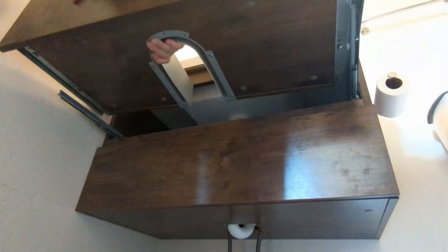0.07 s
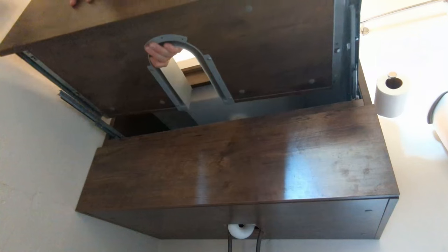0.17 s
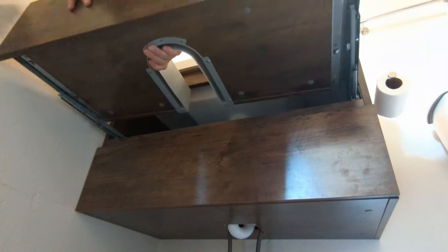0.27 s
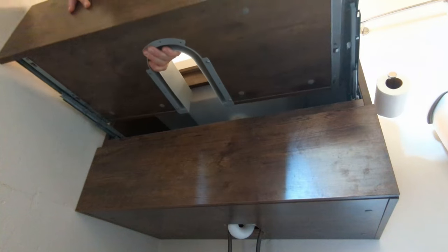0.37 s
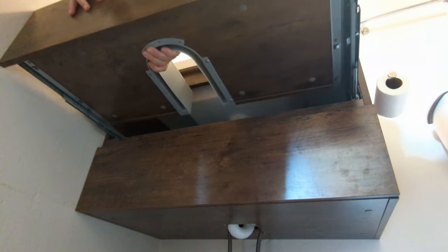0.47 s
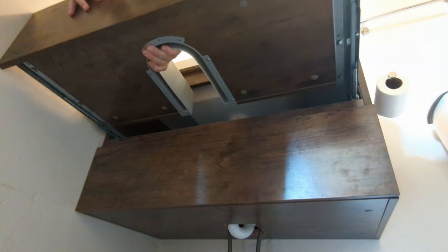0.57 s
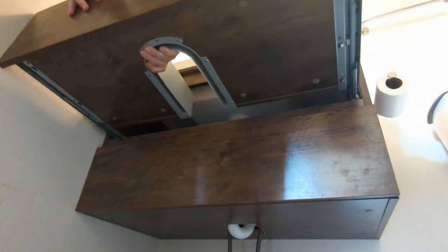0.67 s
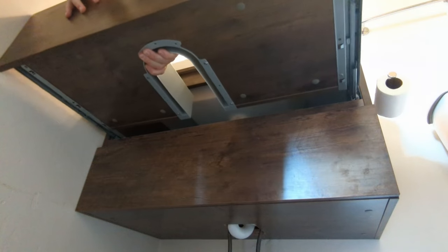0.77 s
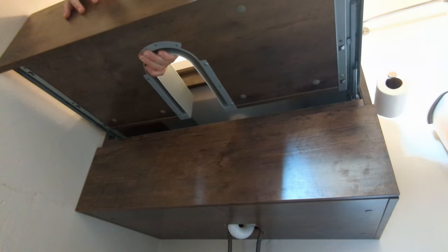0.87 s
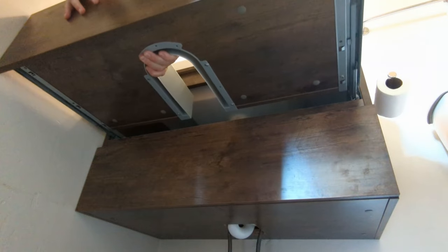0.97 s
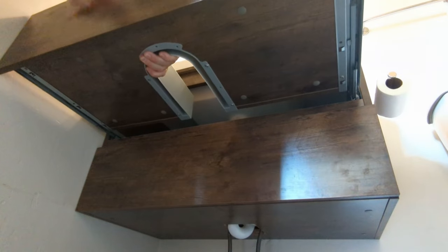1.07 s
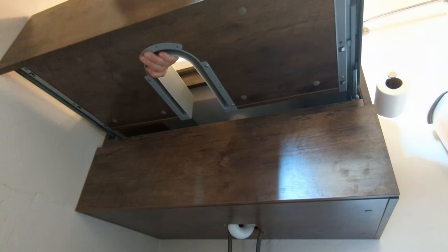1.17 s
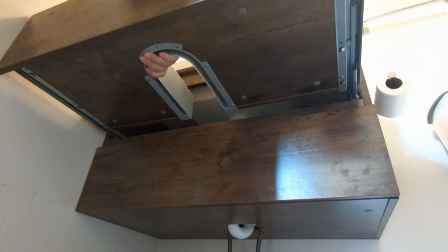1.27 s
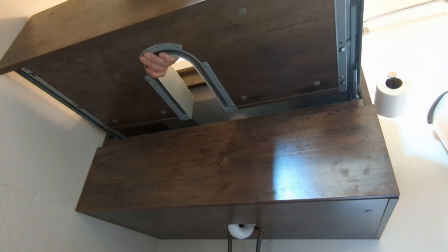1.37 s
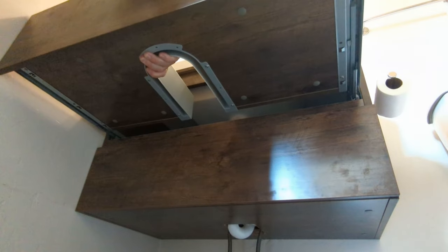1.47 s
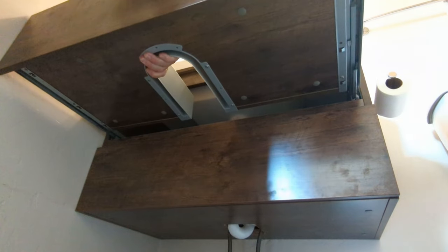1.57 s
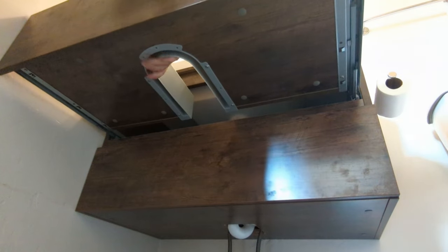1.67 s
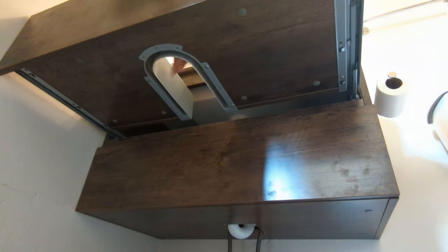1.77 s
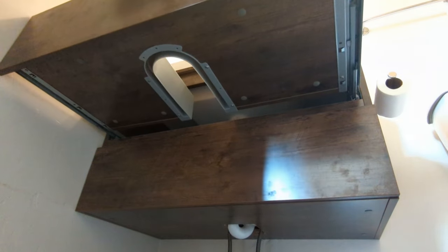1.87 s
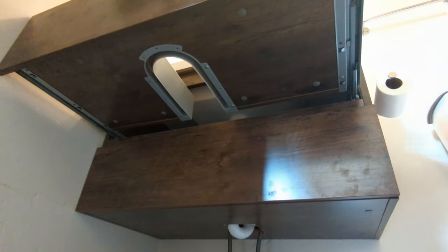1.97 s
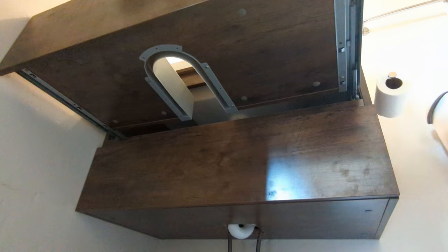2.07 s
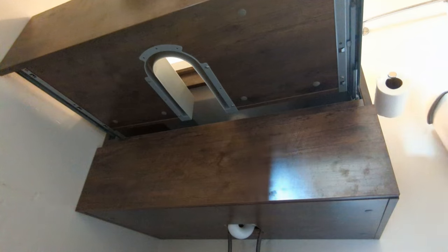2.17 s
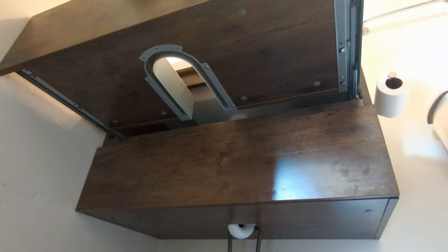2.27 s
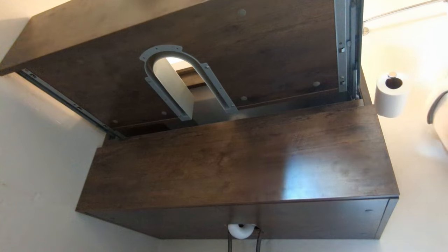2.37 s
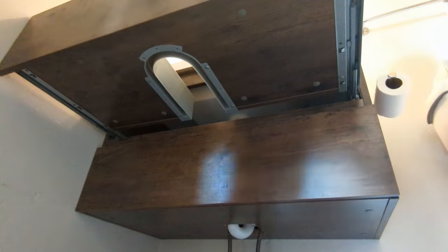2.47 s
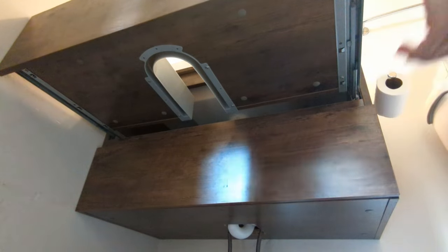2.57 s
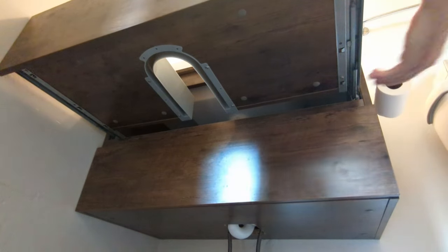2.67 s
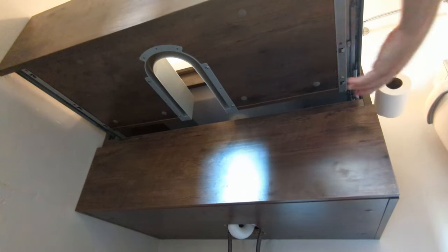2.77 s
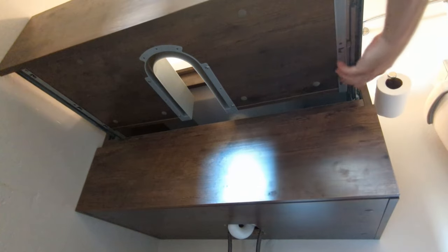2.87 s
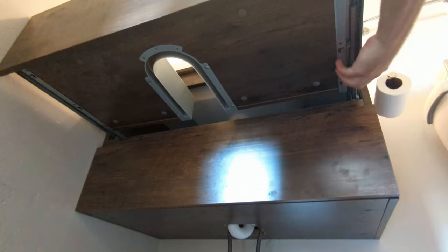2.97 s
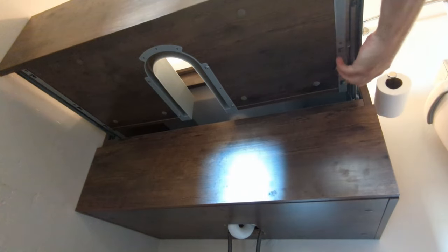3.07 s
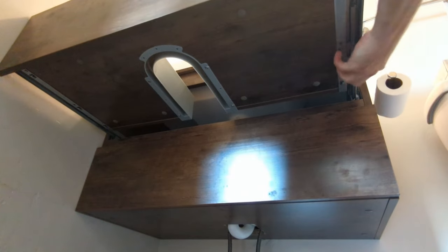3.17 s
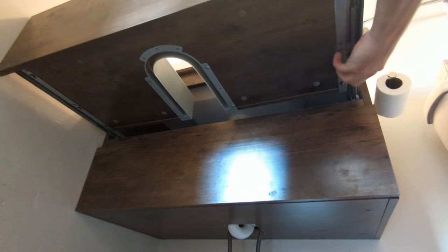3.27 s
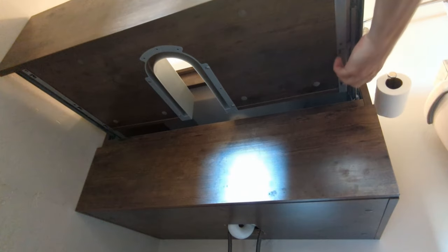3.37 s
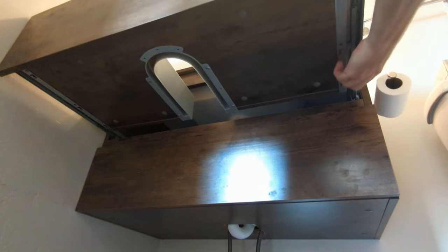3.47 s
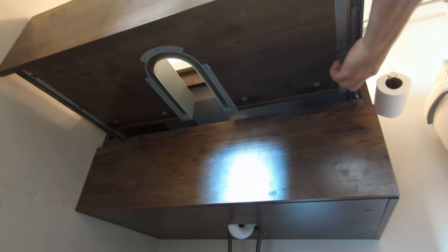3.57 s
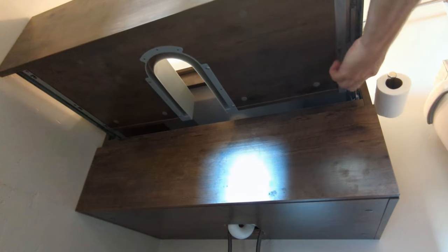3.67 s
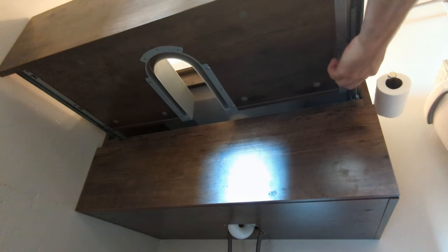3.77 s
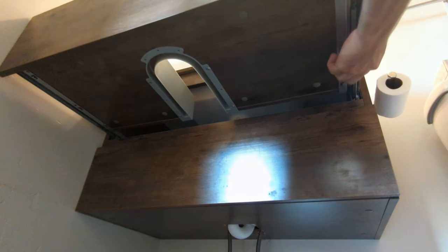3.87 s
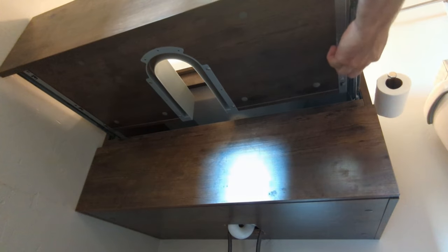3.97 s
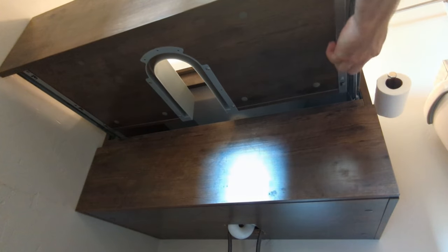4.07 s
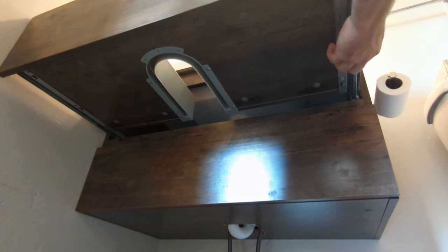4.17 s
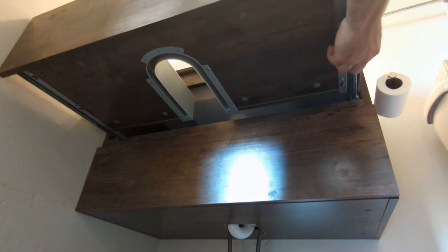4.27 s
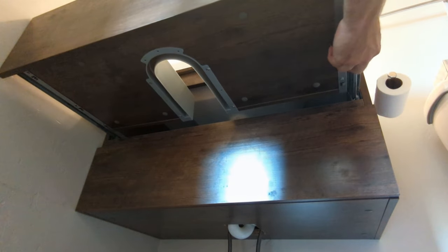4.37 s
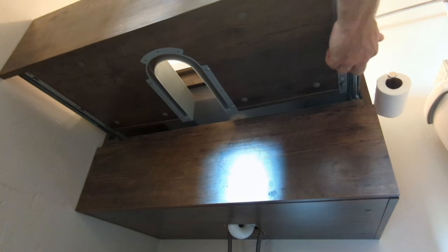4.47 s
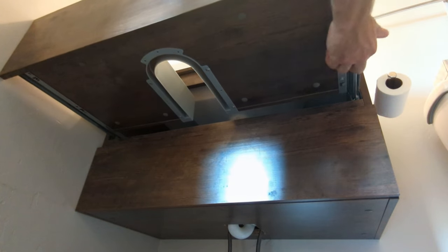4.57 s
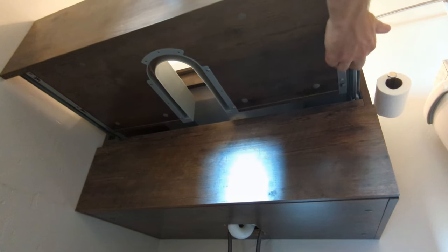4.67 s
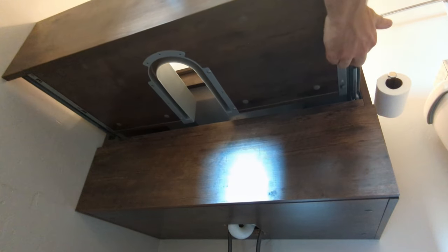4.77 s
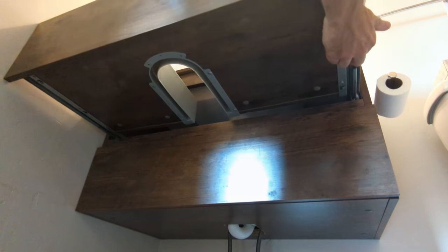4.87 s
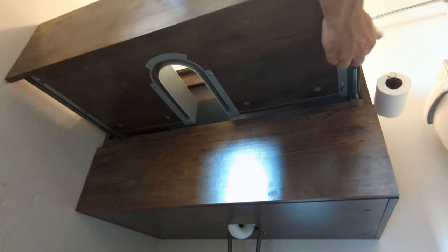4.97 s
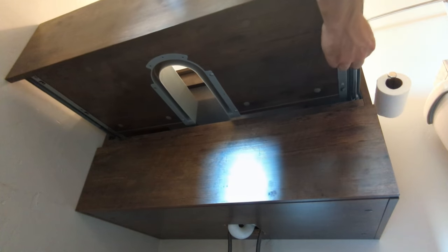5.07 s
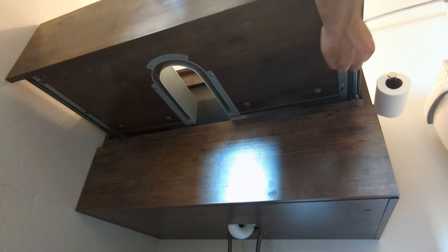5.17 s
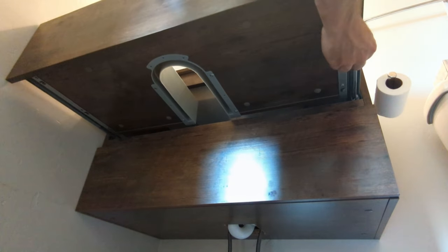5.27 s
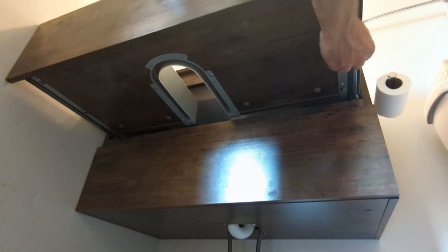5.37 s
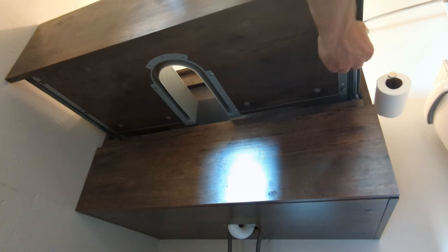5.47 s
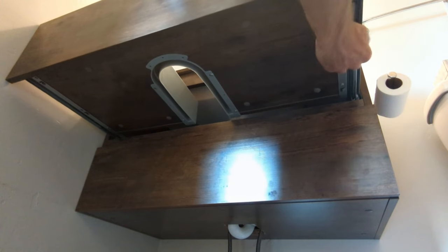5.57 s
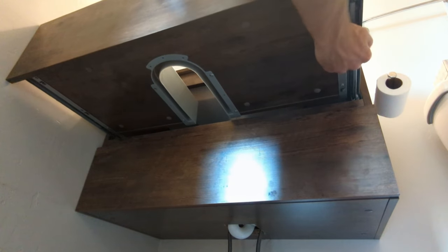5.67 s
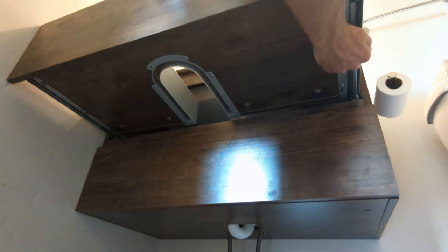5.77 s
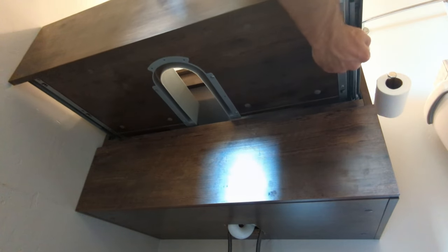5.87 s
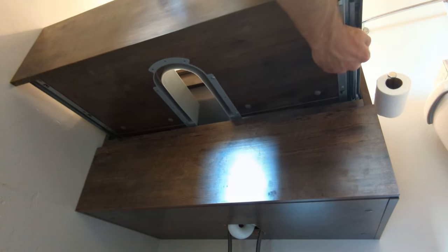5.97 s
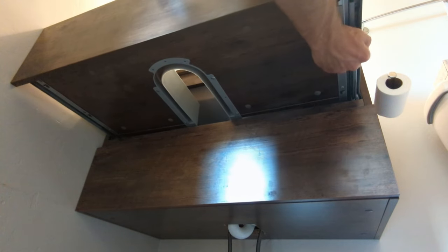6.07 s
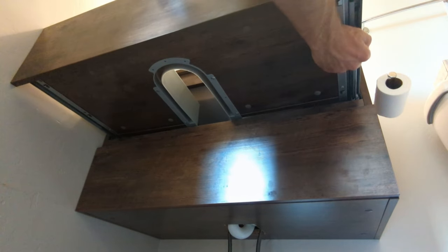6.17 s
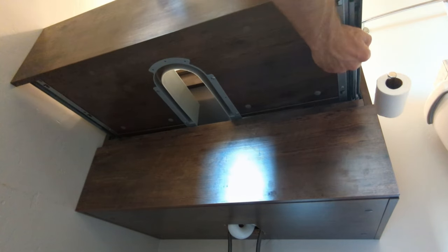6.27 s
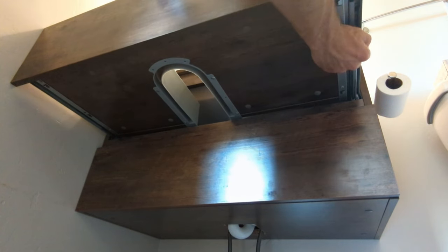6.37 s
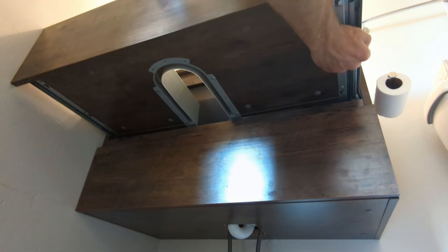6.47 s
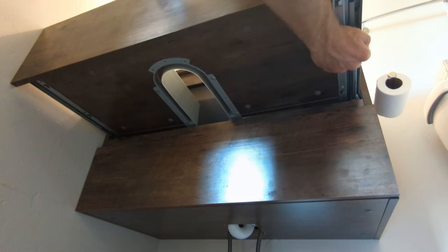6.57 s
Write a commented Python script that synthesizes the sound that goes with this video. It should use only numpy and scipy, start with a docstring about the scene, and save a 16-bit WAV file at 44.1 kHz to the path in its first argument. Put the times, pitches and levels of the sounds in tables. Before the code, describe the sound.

A wooden drawer bumps along steel slides with loud knocks and metallic clacks, then quiet taps and presses end in one sharp metal snap.

```python
"""In a small, hard-walled room, a wooden drawer is worked onto its steel slides, close to the microphones.
It bumps along the rails and slams home; a hand then rubs, taps and presses the slide until a catch snaps.
Contacts are sums of damped modes with noise chatter and a room tail; stretches of scrape, shudder and hiss
are filtered noise under envelopes, some of them microphone hiss as the gate opens.
The room's faint rumble and hiss are shaped noise, and a gate turns the treble down when all is quiet."""
import sys
import numpy as np
from scipy import signal
from scipy.fft import rfft, irfft, next_fast_len
from scipy.io import wavfile
from scipy.ndimage import uniform_filter1d, minimum_filter1d, map_coordinates

SR = 44100
rng = np.random.default_rng(int(sys.argv[2]) if len(sys.argv) > 2 else 0)


def transcribe(u):
    """Save the signal u as a 16-bit wav file named by the first command-line argument.

    u: samples, shape (n,) or (channels, n), limited to [-1, 1]; the rate is SR.
    q: integer samples, one column per channel.
    """
    v = np.clip(np.atleast_2d(u).T, -1, 1)
    q = np.round(v * 32767).astype(np.int16)
    wavfile.write(sys.argv[1], SR, q)


def how_loud(loudness_db):
    """Turn decibels into a plain amplitude multiplier (0 dB gives 1, 20 dB gives 10)."""
    steps = np.asarray(loudness_db, float) / 20
    return 10 ** steps


N = 291942  # length in samples

# Hard knocks and clicks of drawer and slide. Each row: start in seconds, relative levels of knock, cabinet
# and steel in dB, centre of the knock in Hz.
HARD_KNOCKS = [(0.25, -13, -25, -26, 1240), (0.323, -7, -13, -18, 2850), (0.404, -13, -22.5, -28.5, 2174),
               (0.464, -19, -17.5, -40, 1190), (0.627, -21.5, -20, -32.5, 2810),
               (0.752, -3.5, -16, -26, 2090), (0.814, -24, -18.5, -32, 2300),
               (0.905, -28, -33.5, -48, 1707), (1.462, -31, -34.5, -43.5, 1320),
               (1.53, -35.5, -54, -51, 2780), (1.7, -29, -36, -55.5, 1233),
               (1.734, -29, -31.5, -43.5, 1670), (2.394, -53, -57, -59, 2546),
               (3.014, -47.5, -66, -65.5, 1500), (3.164, -44, -52.5, -60, 3284),
               (3.328, -59.5, -60, -58.5, 1450), (3.496, -49.5, -60, -73, 1510),
               (3.588, -48, -58.5, -70.5, 1490), (4.248, -55.5, -55, -65.5, 1590),
               (4.384, -49, -46, -53, 2600), (4.396, -33.5, -31, -50.5, 1950),
               (4.66, -37.5, -56, -52.5, 2510), (4.931, -28, -40.5, -50, 1802),
               (5.308, -46.5, -60, -66, 1742), (5.339, -51.5, -48, -78, 2370), (5.486, -52, -63, -81, 1190),
               (5.619, -43.5, -45.5, -73, 1200), (5.798, -33.5, -32, -59.5, 1266),
               (5.91, -12, -31, -13.5, 1890)]
HARD_BOOM_DB = -6  # a hard knock moves the big panels less than the small ones
# Soft, heavy thumps on the cabinet. Each row: start in seconds, relative levels of boom, thud and knock in dB.
SOFT_THUMPS = [(0.272, -25, -27, -21), (0.539, -13.5, -20, -17.5), (0.761, -9, -14, -12),
               (1.404, -51, -49, -53), (1.42, -40, -38.5, -48), (1.854, -37, -41, -67),
               (3.031, -42, -60.5, -57), (3.365, -41.5, -56.5, -52), (4.534, -19, -19.5, -35),
               (4.6, -24, -29, -47), (4.699, -30.5, -37.5, -63), (4.905, -30.5, -33, -50),
               (5.201, -56.5, -61.5, -59), (6.097, -29.5, -34, -43.5), (6.56, -50, -51.5, -67.5)]
THUMP_STEEL_DB, THUMP_CENTRE_HZ = -21.5, 1500  # rail relative to the knock; centre of the knock
# Modes of the cabinet panels, lowest first. Each row: frequency in Hz, relative level in dB, t60 in seconds.
CABINET_MODES = [(46, -17, .2), (65.3, -9, 0.28), (95.7, -8, 0.23), (111, -3.5, .2), (137, 2, 0.11),
                 (168.6, -5, 0.13), (209, 1, 0.054), (231, -0.5, 0.077), (289.5, -3, .12),
                 (352.9, -2.5, .1), (424.9, -1, 0.073), (504, -7, .08), (580, -10, 0.12), (697, -7.5, .06),
                 (840, -12, 0.046), (1000, -16, 0.056)]
# Modes of the drawer box. Each row: frequency in Hz, relative level in dB, t60 in seconds.
BOX_MODES = [(837, -3.5, 0.053), (1036.3, -8.5, 0.035), (1240, 1, 0.021), (1457, -13, 0.046),
             (1677, 7.5, 0.031), (1880, -8, 0.02), (2413, -5.5, 0.075), (2670, -1, 0.012),
             (2850, -14.5, 0.057), (3120, -12.5, 0.017)]
# Modes of the steel rail. Each row: frequency in Hz, relative level in dB, t60 in seconds.
RAIL_MODES = [(4393, -7, .06), (4554, -4, .12), (5300, -8, .05), (6234, -6, .05), (6697, -2, .14),
              (6944, -2, .16), (9250, -9, .04), (10600, -9, .04)]
# Chatter of the box. Each row: frequency in Hz, relative density in dB per Hz.
BOX_CHATTER = [(350, -38), (600, -8), (1350, -8.5), (1680, -9.5), (1830, -8), (2430, -8.5), (4500, -24.5),
               (5850, -59), (9900, -120)]
# Chatter of the rail. Each row: frequency in Hz, relative density in dB per Hz.
RAIL_CHATTER = [(1760, -35.5), (3000, -5), (4020, -5.5), (4700, -3.5), (5500, -5.5), (6860, -4.5),
                (7750, -6), (15100, -12), (16200, -24.5), (16500, -39)]
# Decay of the room. Each row: frequency in Hz, t60 in seconds.
ROOM_DECAY = [(70, 0.64), (150, 0.37), (1000, 0.44), (4000, 0.34), (12000, 0.26)]
# Stretches of grainy scrape, low shudder and smooth hiss; some are microphone hiss as the gate opens.
# Each row: start in seconds, length in seconds, scrape in dB, hiss in dB, growth in dB by the end.
STRETCHES = [(0, 0.084, -66.5, -70.5, 15.5), (0.732, 0.029, -35, -41, 15.5), (1.534, 0.13, -63, -61, -0.5),
             (1.673, 0.022, -59, -68, 7.5), (1.94, .07, -90.5, -75.5, 2.5),
             (2.068, 0.25, -72.5, -91.5, 9.5), (2.228, 0.11, -75, -59, 5), (2.36, 0.7, -65.5, -69.5, -6),
             (2.655, 0.054, -71.5, -68, -4), (2.868, 0.097, -75.5, -69.5, -4.5),
             (3.38, 0.11, -68.5, -78, -1), (3.511, 0.056, -63, -80, 3), (3.753, 0.202, -70.5, -67.5, -0.5),
             (4.675, 0.06, -42, -55, -6.5), (4.762, 0.15, -54, -71, -6.5), (5.78, 0.017, -64, -87.5, 16)]
ATTACK_SHARE, RELEASE_S = 0.25, 0.035  # lead-in as a share of the stretch's length; dying away in seconds
# Grainy scrape. Each row: frequency in Hz, relative density in dB per Hz.
SCRAPE_SPECTRUM = [(350, -35.5), (600, -2), (696, -4.5), (845, -4), (1330, -0.5), (2550, -2.5),
                   (5500, -14.5), (7150, -37.5), (12100, -120)]
# Smooth hiss of the stretches. Each row: frequency in Hz, relative density in dB per Hz.
HISS_SPECTRUM = [(1760, -34.5), (3000, -6.5), (5500, -5), (6910, 3), (8140, -8), (9000, 2), (10700, -3.5),
                 (12000, -2), (15100, -11), (16200, -14), (16500, -30)]
# Low shudder of the cabinet under a scrape. Each row: frequency in Hz, relative density in dB per Hz.
SHUDDER_SPECTRUM = [(40, -29), (80, -7), (130, 1.5), (300, -3), (500, -8.5), (900, -42), (2000, -120)]
SHUDDER_DB = -1  # relative to the scrape
# Course of the rumble before its random swell. Each row: time in seconds, level in dB.
RUMBLE_COURSE = [(0, -48), (.1, -54.5), (2, -54), (3.9, -55.5), (5.2, -57), (5.7, -51.5), (6.62, -57)]
# Murmur of the building. Each row: frequency in Hz, relative density in dB per Hz.
MURMUR_SPECTRUM = [(18, -47), (30, -12), (54, 0), (76, 3.5), (96, -12.5), (130, -1.5), (183, -24),
                   (217, -13), (280, -23), (383, -18), (900, -36.5), (1170, -59), (1980, -120)]
# Steady hiss of the background. Each row: frequency in Hz, relative density in dB per Hz.
AIR_SPECTRUM = [(410, -32), (700, -7.5), (854, -23.5), (888, -18.5), (1170, -11.5), (1860, -16.5),
                (2460, -17.5), (7970, -31), (16500, -36)]
# Likeness of the two ports. Each row: frequency in Hz, left-right correlation from 0 to 1.
PORT_LIKENESS = [(60, 0.98), (150, 0.92), (380, 0.92), (950, 0.73), (2380, 0.93), (5980, 0.39), (15000, 1)]
# Balance of the two ports. Each row: frequency in Hz, left over right in dB.
PORT_BALANCE = [(60, 1), (150, 0), (380, 1.5), (950, -1), (2380, 1), (5980, -0.5), (15000, 2.5)]
PORT_LAG_S = 0.00031  # time by which the left port hears the bass first


def drawer():
    """Superposition: every contact adds its direct sound and its own room tail."""
    out = np.zeros((2, N + SR))
    hard = [(s, knock, wood + HARD_BOOM_DB, wood, steel, hz) for s, knock, wood, steel, hz in HARD_KNOCKS]
    soft = [(s, knock, boom, thud, knock + THUMP_STEEL_DB, THUMP_CENTRE_HZ)
            for s, boom, thud, knock in SOFT_THUMPS]
    for start, *settings in hard + soft:
        near, sent = blow(*settings)
        heard = how_loud(-0.5) * signal.fftconvolve(sent, echo(), axes=1)
        heard[:, :near.shape[1]] += near
        place = out[:, round(start * SR):]
        place[:, :heard.shape[1]] += heard
    return out[:, :N]


def blow(knock_db, boom_db, thud_db, steel_db, centre_hz):
    """Impact excitation: one contact rings cabinet, box and rail; gives the near pair and what the room gets."""
    t = np.arange(SR // 6) / SR
    head = SR // 25

    def level(x):
        """Normalisation to rms 1 over the first 40 ms."""
        return x / np.sqrt(np.mean(x[..., :head] ** 2))

    # heavy panels take time to swing up
    panels = ringing(CABINET_MODES, t, scatter_db=3.5) * (1 - np.exp(-t / 0.002))
    big = np.transpose(CABINET_MODES)[0] < 200
    boom, thud = level(panels[big].sum(0)), level(panels[~big].sum(0))
    wood = how_loud(boom_db - 6.5) * boom + how_loud(thud_db - 7.0) * thud
    touch = np.arange(len(t)) == SR // 300  # a single impulse

    def spot(hz):
        """Selective excitation: each place of contact favours one pitch."""
        octaves = np.log2(hz / centre_hz + 1e-9)
        return how_loud(-1) + 1 / (1 + (octaves / 1.2) ** 2)

    def part(modes, ring_db, spectrum, life, rise, colour):
        """Modal ring with decaying chatter nearby; the far walls get the ring and one clean click."""
        swell = 1 - np.exp(-t / rise)
        ring = how_loud(ring_db) * level(swell * ringing(modes, t, scatter_db=2.5).sum(0))
        chatter = level(swell * np.exp(-t / life) * noise(spectrum, (2, len(t))))
        click = level(filtered(touch, lambda hz: how_loud(along(spectrum, hz))))
        late_ring = np.roll(ring, SR // 2500)
        return level(filtered(np.array([ring + chatter[0], late_ring + chatter[1], ring + click]), colour))

    # rows of each sum: shared near sound, differing near sound, sound sent into the room
    knock = part(BOX_MODES, ring_db=-7.5, spectrum=BOX_CHATTER, life=0.015, rise=0.003, colour=spot)
    ping = np.sin(2 * np.pi * centre_hz * t) * how_loud(-60 * t / 0.035) * (1 - np.exp(-t / 0.002))
    knock += how_loud(-5) * level(ping) * [[1], [0.3], [0.3]]  # the struck spot pings
    steel = part(RAIL_MODES, ring_db=-11, spectrum=RAIL_CHATTER, life=0.0045, rise=0.0016, colour=np.ones_like)
    sound = how_loud(knock_db - 14.0) * knock + how_loud(steel_db - 8) * steel + wood * [[1], [0], [1]]
    return sound[:2], sound[2:]


def ringing(modes, t, scatter_db):
    """Modal decay: damped sines of one object, with strengths and pitches drawn anew for each blow."""
    hz, db, t60 = np.transpose(modes)[:, :, None]
    chance = rng.standard_normal((len(modes), 2, 1))
    sign = (-1) ** np.arange(len(modes))[:, None]  # neighbours start opposed
    strength = how_loud(db + scatter_db * chance[:, 0] - 60 * t / t60)
    pitch_hz = hz * (1 + 0.012 * chance[:, 1])
    return sign * strength * np.sin(2 * np.pi * pitch_hz * t)


def echo():
    """Diffuse reverberation: two fresh noise tails of energy 1, each frequency dying at its own speed."""
    hz, t = np.fft.rfftfreq(512, 1 / SR), np.arange(88) * 256 / SR
    shape = (2, len(hz), len(t))
    grains = rng.standard_normal(shape) + 1j * rng.standard_normal(shape)
    decay = how_loud(-60 * t / along(ROOM_DECAY, hz)[:, None])
    tail = signal.istft(grains * decay, SR, nperseg=512)[1]
    tail[:, :round(0.004 * SR)] = 0  # the nearest wall is a few milliseconds away
    return tail / np.linalg.norm(tail, axis=1, keepdims=True)


def scrapes_and_hisses():
    """Noise under envelopes: stretches of grainy scrape, low shudder and smooth hiss, flickering in level."""
    t, scrape, hiss = np.arange(N) / SR, np.zeros(N), np.zeros(N)
    for start, length, scrape_db, hiss_db, growth_db in STRETCHES:
        end = start + length
        corners = [start - ATTACK_SHARE * length, start, end, end + RELEASE_S]
        edges = np.interp(t, corners, [0, 1, 1, 0]) ** 2
        envelope = edges * how_loud(growth_db * np.clip((t - start) / length, 0, 1))
        scrape += how_loud(scrape_db) * envelope
        hiss += how_loud(hiss_db) * envelope
    flicker = how_loud(1.2 * wobble(40) + 2.2 * wobble(300))
    grain = noise(SCRAPE_SPECTRUM, (2, N))
    shudder = how_loud(SHUDDER_DB) * noise(SHUDDER_SPECTRUM, N) * [[1], [0]]  # shared by both ports
    return flicker * (scrape * (grain + shudder) + hiss * noise(HISS_SPECTRUM, (2, N)))


def rumble():
    """Stationary noise under slow modulation: the building's uneven murmur over a steady faint hiss."""
    seconds, course_db = np.transpose(RUMBLE_COURSE)
    level_db = np.interp(np.arange(N) / SR, seconds, course_db)
    swell_db = 1.8 * wobble(7)
    murmur = how_loud(level_db + swell_db) * noise(MURMUR_SPECTRUM, (2, N))
    return murmur + how_loud(-70) * noise(AIR_SPECTRUM, (2, N))


def noise(spectrum, size):
    """Spectral shaping: white noise through a curve, scaled to rms 1."""
    return unit(filtered(rng.standard_normal(size), lambda hz: how_loud(along(spectrum, hz))))


def wobble(rate):
    """Random modulation: a smooth curve through random knots, rate knots a second."""
    knots = rng.standard_normal(int(N * rate / SR) + 4)
    return map_coordinates(knots, [np.arange(N) * rate / SR])


def filtered(x, response):
    """Linear filtering: the spectrum of x times a response of frequency."""
    n = x.shape[-1]
    m = next_fast_len(n + 2048)
    return irfft(rfft(x, m) * response(np.fft.rfftfreq(m, 1 / SR)), m)[..., :n]


def along(points, hz):
    """Logarithmic frequency scale: (Hz, value) points interpolated on a log axis."""
    f, v = np.transpose(points)
    return np.interp(np.log(hz + 1), np.log(f + 1), v)


def unit(x):
    """Normalisation to rms 1."""
    return x / np.sqrt(np.mean(x ** 2) + 1e-20)


def ports(pair):
    """Stereo coherence: two microphone ports share the first sound and differ by the second."""
    def turn(hz):
        """Mixing angle that gives the wanted correlation."""
        return np.arccos(np.clip(along(PORT_LIKENESS, hz), -1, 1)) / 2

    side = np.array([[1], [-1]])

    def skew(hz):
        """Level and phase difference; the phase stops growing above 700 Hz."""
        balance = how_loud(side * along(PORT_BALANCE, hz) / 2)
        return balance * np.exp(1j * np.pi * side * np.minimum(hz, 700) * PORT_LAG_S)

    shared, own = filtered(pair, lambda hz: np.array([np.cos(turn(hz)), np.sin(turn(hz))]))
    return filtered(np.array([shared + own, shared - own]), skew)


def scene():
    """Superposition of contacts, scrapes and hisses, and rumble at the microphone ports."""
    return ports(drawer() + scrapes_and_hisses() + rumble())


def hush(x, edge_hz, threshold_db, depth_db, knee_db, hold):
    """Downward gating: the upper band drops a little soon after its level sinks under a threshold."""
    high = filtered(x, lambda hz: 1 / (1 + (edge_hz / (hz + 1)) ** 4))
    power = uniform_filter1d(np.mean(high ** 2, 0), size=600)
    level_db = 10 * np.log10(np.abs(power) + 1e-14)
    span = round(hold * SR)  # hold in seconds
    held_db = -minimum_filter1d(-level_db, span, origin=(span - 1) // 2)  # loudest of the moments just past
    shut = 0.5 - 0.5 * np.tanh((held_db - threshold_db) / knee_db)
    return x - high * (1 - how_loud(-depth_db * uniform_filter1d(shut, size=400)))


def band_limit(x):
    """A steep low-pass at the top of the band."""
    return signal.sosfilt(signal.butter(12, 17010, fs=SR, output="sos"), x)


def record(dry):
    """Signal chain: third-order bass cut, treble gate, then saturation at full scale."""
    x = filtered(dry, lambda hz: (1j * hz / (1j * hz + 40)) ** 3)
    x = hush(x, edge_hz=990, threshold_db=-67.5, depth_db=7, knee_db=3.0, hold=0.0066)
    mix = x / (1 + np.abs(x) ** 6) ** (1 / 6)  # soft clipping
    return band_limit(mix)


dry = scene()
out = record(dry)
transcribe(out)
```